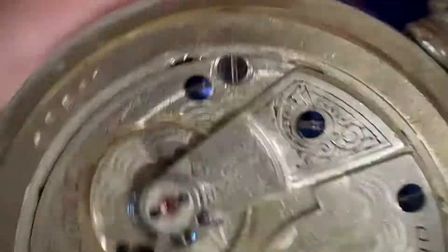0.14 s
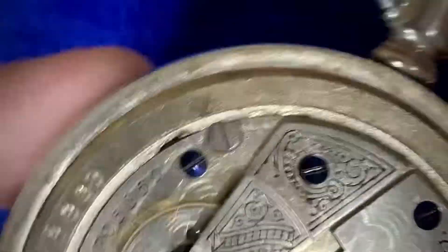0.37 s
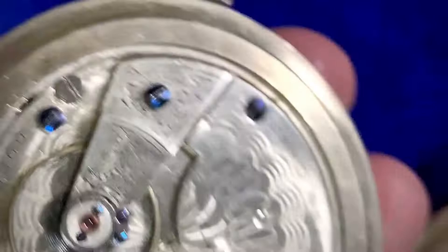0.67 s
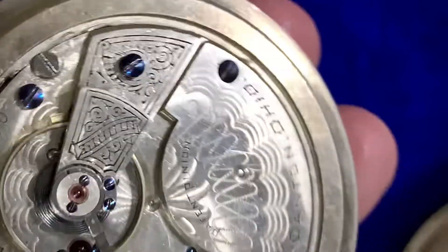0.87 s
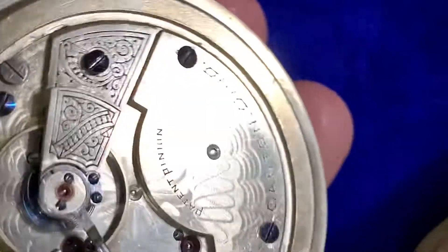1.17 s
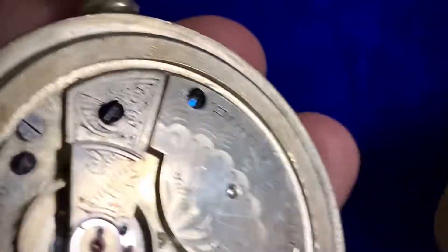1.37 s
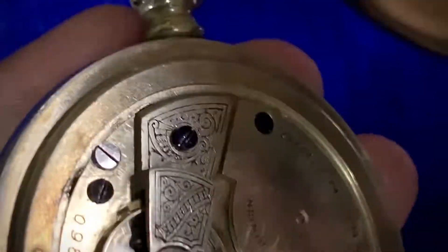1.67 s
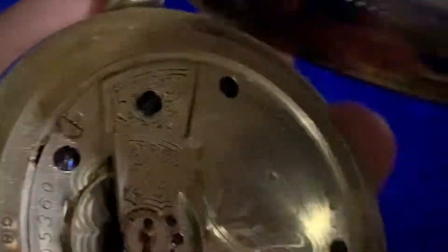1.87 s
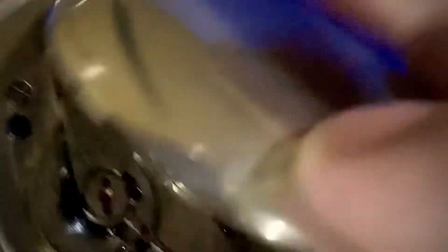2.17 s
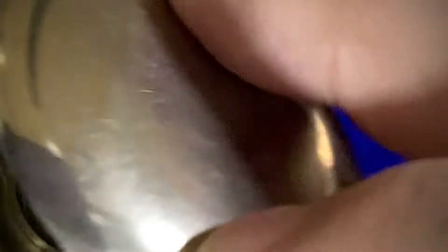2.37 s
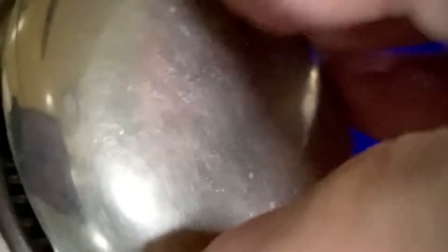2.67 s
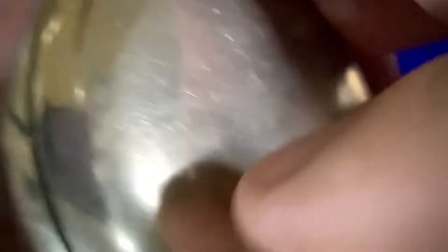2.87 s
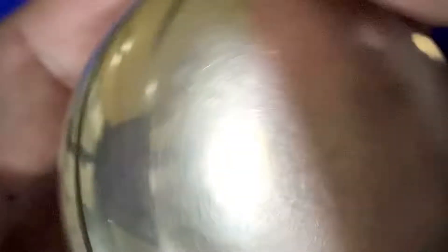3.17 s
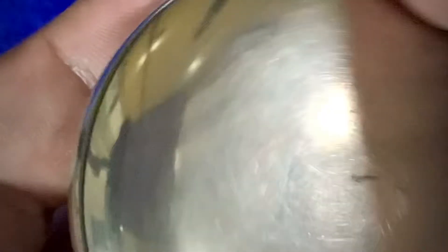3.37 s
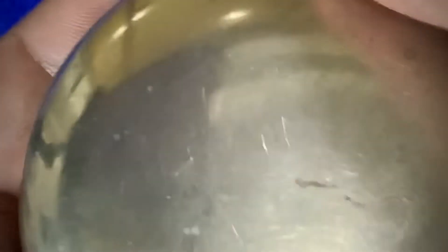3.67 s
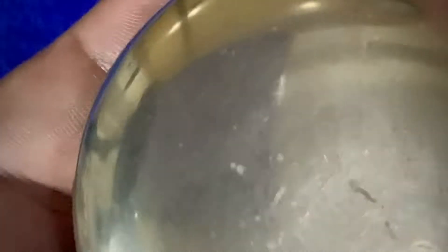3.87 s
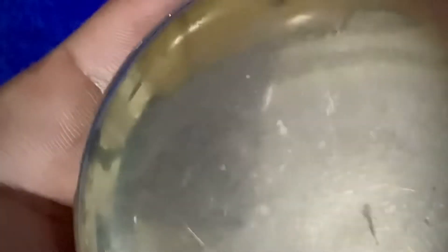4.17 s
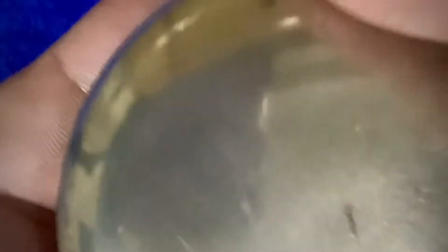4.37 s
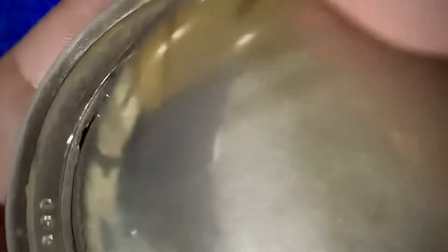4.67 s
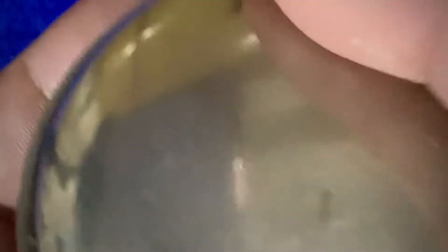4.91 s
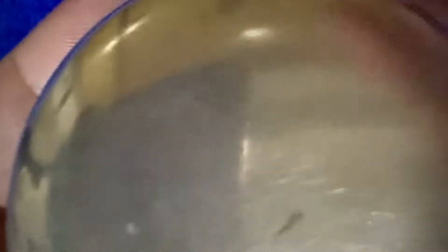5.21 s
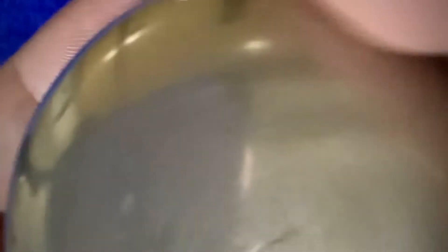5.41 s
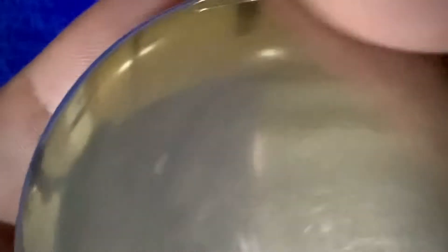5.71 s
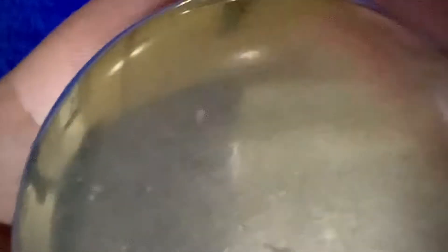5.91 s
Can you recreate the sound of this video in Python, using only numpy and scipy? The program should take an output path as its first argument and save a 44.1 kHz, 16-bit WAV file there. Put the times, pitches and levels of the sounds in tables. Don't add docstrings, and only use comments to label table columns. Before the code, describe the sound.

A pocket watch ticks faintly and rapidly in a quiet room, then its thin metal lid snaps shut and is knocked, clicked and rubbed by fingers.

```python
import sys
import numpy as np
from scipy import signal
from scipy.fft import rfft, irfft, next_fast_len
from scipy.io import wavfile
from scipy.ndimage import uniform_filter1d, minimum_filter1d

SR = 44100
rng = np.random.default_rng(int(sys.argv[2]) if len(sys.argv) > 2 else 0)


def volts_from_decibels(level):
    exponent = np.asarray(level, float) / 20
    return 10 ** exponent


def file_out(sig):
    cols = np.atleast_2d(sig).T
    lim = np.clip(cols, -1, 1)
    pcm = np.round(lim * 32767).astype(np.int16)
    wavfile.write(sys.argv[1], SR, pcm)


N = 266805

# (frequency [Hz], level [dB], time to fall 60 dB [s])
LID_MODES = [(4600, -18, .04), (4930, -5, .065), (4975, -1, .065), (6358, -26, .1), (7251, -20, .15),
             (7413, 1, .17), (7455, -12, .1), (8300, -17, .045), (8700, -20, .06), (9243, -20, .08),
             (9790, -22, .08), (10100, -17, .04), (10588, -2, .14), (10702, -7, .12), (11720, -2, .1),
             (11840, -4, .07), (12260, -15, .05), (12500, -12, .025), (13220, -22, .06), (14445, -9, .13),
             (14630, -14, .06)]
# (frequency [Hz], level [dB per Hz])
METAL_SHEEN = [(1500, -42.5), (3000, -21), (4900, -3.5), (6200, -10), (7500, -3.5), (11000, -6),
               (14500, -6), (15500, -9), (16600, -55.5)]
# (time [s], peak [dB], clatter
# [dB], upper ring [dB], how freely the lid rings [0-1])
SNAPS = [(1.786, -20.5, -14, -23, 0.23), (1.802, -26.5, -13.5, -28, 0.74), (1.808, -50.5, 41.5, -26, 0.7),
         (2.047, -36.5, -7.5, -28, 0.43), (2.559, -8.5, -28.5, -9, 0.15),
         (2.562, -15.5, -16.5, -17.5, 0.32), (2.751, -7, -15.5, -11.5, 0.32),
         (4.417, -23.5, -15.5, -23.5, 1), (4.481, -3, -19, -31.5, 0.26), (4.486, -7, -21.5, -12.5, 0.4),
         (4.493, -10, -16, -12.5, 0.4), (4.500, -14, -27.5, -24, 0), (4.54, -21, -14.5, -41, 0.7),
         (4.548, -16, -32.5, -9, 0.6), (4.575, -30.5, -9.5, -18.5, 1), (2.793, -17, -21.5, -10, 0.87),
         (4.128, -18, -16.5, -5.5, 1), (4.741, -24.5, -20, -17, 0.5), (4.766, -16, -5.5, -4.5, 0.89),
         (4.769, -9.5, -51, -1, 0), (4.914, -30.5, -1, -2.5, 0.88), (4.931, -25, -54, -13, 0.7),
         (4.937, -16, -16, -16, 0.6), (4.943, -16.5, -21, -1, 0.36)]
# (time [s], peak [dB], hollow [dB],
# how freely the lid rings [0-1])
KNOCKS = [(2.182, -52.5, -54, 1), (2.736, -33, 8.5, 1), (4.607, -41, -12, 0), (3.146, -53, -15.5, 1),
          (3.196, -28.5, -1.5, 0.09), (3.33, -45.5, -2.5, 1), (3.346, -40, -13, 0.9),
          (3.462, -44.5, 12.5, 0.68), (3.474, -99, 0, 0.5), (3.704, -20.5, -11.5, 0.17),
          (3.712, -25, -15.5, 1), (3.732, -26.5, -7.5, 0.2), (3.742, -23, -16, 0.58),
          (3.845, -38, -7.5, 0.5), (4.021, -49.5, 0, 1), (4.032, -36, -9.5, 1), (4.097, -31.5, -15, 0.5),
          (4.202, -52, -22, .6), (4.142, -25, -15, 0.46), (4.346, -10.5, -17, 0.19),
          (4.398, -21.5, -7, 0.2), (4.41, -21.5, -11, 0), (5.049, -35, -13, 1), (5.098, -29.5, -13, 0.9),
          (5.102, -36.5, -10, 1), (5.119, -19.5, -21, 0.14), (5.369, -30, -10.5, 0.56),
          (5.381, -39.5, -12, 1), (5.428, -23.5, -10, 0), (5.707, -57, -16, 0.96)]
LID_RING_ON = 1.136
STIR_WIDTH_HZ = 25


def evened(x):
    return x / np.sqrt(np.mean(x ** 2) + 1e-20)


def by_attack(x):
    return x / np.sqrt(np.mean(x[:350] ** 2) + 1e-20)


def peaked(x):
    return x / abs(x).max()


def dying(t, t60):
    return volts_from_decibels(-60 * t / t60)


def faded_end(t):
    return np.minimum((t[-1] - t) / .03, 1)


def read(points, hz, axis=1):
    rows = np.array(points)
    return np.interp(np.log(hz + 1), np.log(rows[:, 0] + 1), rows[:, axis])


def curve(rows):
    rows = np.array(rows)
    return np.interp(np.arange(N) / SR, rows[:, 0], rows[:, 1])


def add(mix, s, sound):
    part = mix[max(round(s * SR), 0):][:len(sound)]
    part += sound[:len(part)]


def resonate(x, hz, width):
    return signal.lfilter(*signal.iirpeak(min(hz, .49 * SR), max(hz / width, .3), SR), x)


def body(x, peaks):
    return sum(volts_from_decibels(db) * resonate(resonate(x, hz, w), hz, 2 * w) for hz, w, db in peaks)


def shifted(peaks, spread):
    draws = rng.standard_normal((len(peaks), 2))
    return [(hz * np.exp(spread * a), w, db + 2.5 * b) for (hz, w, db), (a, b) in zip(peaks, draws)]


def coloured(x, points):
    size = x.shape[-1]
    return irfft(rfft(x) * volts_from_decibels(read(points, np.fft.rfftfreq(size, 1 / SR))), size)


def ring(modes, t, free, spread_db):
    hz, db, t60 = np.transpose(modes)[:, :, None]
    weight, detune = rng.standard_normal((len(modes), 2)).T[:, :, None]
    rise = 1 - np.exp(-t / .0003)
    shape = volts_from_decibels(db + spread_db * weight) * np.exp(-np.log(1000) / (t60 * free) * t) * rise
    return shape * np.sin(2 * np.pi * hz * (1 + .0015 * detune) * t)


def air():
    # (frequency [Hz], level [dB per Hz])
    hiss_spectrum = [(15, -31), (25, -19.5), (70, -8.5), (177, -10), (304, -16), (445, -32), (524, -25.5),
                     (687, -20), (1060, -27), (1780, -29.5), (2090, -27), (3320, -30), (13300, -36),
                     (14800, -47), (16500, -48.5)]
    # (frequency [Hz], correlation [-1 to 1])
    likeness = [(60, 0.63), (150, 0.89), (380, 0.73), (950, -1.1), (2380, 0.064), (5980, 0.22),
                (15000, -1.7)]
    # (time [s], level [dB])
    drone_level = [(0.0, -59.5), (0.66, -58), (2.7, -65), (2.85, -71.5), (4.08, -71.5), (4.48, -58.5),
                   (4.73, -74), (5.73, -73.5), (6.05, -55)]
    # (frequency [Hz], width [Hz], level [dB])
    drone_tones = [(265.4, 32, 6), (304.8, 13, 9.5), (413, 12, 1), (209, 90, 4.5), (700, 88, -8.5)]
    # (time [s], level [dB])
    rumble_level = [(0.0, -61.5), (0.57, -60), (2.39, -65), (2.78, -59), (2.95, -68), (4.04, -65),
                    (4.21, -57), (5.37, -72), (6.05, -58)]
    # (frequency [Hz], width [Hz], level [dB])
    whine_bands = [(14400, 50, -90)]
    frames, hz = N // 512 + 5, np.fft.rfftfreq(2048, 1 / SR)
    a, b, c, d, patches = rng.standard_normal((frames, 1025, 5)).T
    patches = evened(uniform_filter1d(uniform_filter1d(patches, 20, 0), 8, 1))
    same = np.clip(read(likeness, hz), -1, 1)[:, None]
    left = a + 1j * b
    right = same * left + np.sqrt(1 - same ** 2) * (c + 1j * d)
    z = np.array([left, right]) * volts_from_decibels(read(hiss_spectrum, hz)[:, None] + 2.5 * patches)
    tone = volts_from_decibels(-69.5) * evened(signal.istft(z, nperseg=2048, noverlap=1536)[1][:, :N])
    noise = rng.standard_normal((3, N))
    noise = noise[0] + 0.35 * noise[1:]
    drone = volts_from_decibels(curve(drone_level) - 3.0) * evened(body(noise, drone_tones))
    rumble = volts_from_decibels(curve(rumble_level) + 2.5) * evened(body(noise, [(61.5, 14, 1.5), (103.0, 23, -8.5)]))
    whine = sum(volts_from_decibels(db) * evened(body(noise, [(f, w, 0)])) for f, w, db in whine_bands)
    return tone + drone + rumble + whine


def settling():
    kicks = np.zeros(N)
    for s, db, *_ in SNAPS + KNOCKS:
        add(kicks, s, volts_from_decibels([db / 2 - 50]))
    return signal.lfilter([1], [1, -dying(1 / SR, 0.35)], kicks)


def rubbing():
    # (time [s], level [dB])
    grip = [(0, -88.5), (.5, -72), (.85, -74.5), (1.2, -87.5), (1.75, -77.5), (1.97, -71), (2.4, -82.5),
            (2.6, -80), (2.73, -54.5), (2.9, -76.5), (3.3, -67.5), (3.5, -89), (4.1, -72.5), (4.5, -65.5),
            (4.82, -76), (4.97, -55), (5.22, -90.5), (6.05, -64)]
    # (frequency [Hz], level [dB per Hz])
    skin_spectrum = [(290, -32), (500, -15), (949, -6.5), (1380, -2), (2010, -7.5), (2220, -6), (2620, -9),
                     (7000, -12.5), (9100, -43.5), (15400, -120)]
    clumps = evened(uniform_filter1d(rng.standard_normal((2, N)), 700))
    bursts = np.minimum(rng.exponential(1, N), 4)
    grains = rng.standard_normal((2, N)) * volts_from_decibels(3.0 * clumps + 1.5 * bursts)
    stirred = sum(volts_from_decibels(db) * resonate(grains[1], hz, 2 / t60 + STIR_WIDTH_HZ) for hz, db, t60 in LID_MODES)
    whisper = evened(coloured(grains[1], METAL_SHEEN)) + volts_from_decibels(-7.5) * evened(stirred)
    grip_db = curve(grip)
    skin = volts_from_decibels(grip_db - 1) * evened(coloured(grains[0], skin_spectrum))
    return skin + (volts_from_decibels(grip_db - 6) + settling()) * whisper


def bump(db, hz):
    t, t60 = np.arange(4000) / SR, 0.0086 + 5 / hz
    push = rng.standard_normal(len(t)) * dying(t, 2.1 * t60) * np.minimum(t / 0.00042, 1)
    sound = body(push, [(hz, 2.1 / t60 + 0.17 * hz, 0), (1.4 * hz, 1.0 * hz, -12)])
    soft = signal.butter(4, 1.8 * hz, fs=SR, output="sos")
    return volts_from_decibels(db) * peaked(signal.sosfilt(soft, sound))


def scrape(length, db, hz, width):
    size = round(length * SR)
    noise, lumps = rng.standard_normal((2, 30000))[:, :size]
    rubbed = body(noise * volts_from_decibels(3.0 * evened(uniform_filter1d(lumps, 200))), [(hz, width, 0)])
    return volts_from_decibels(db) * evened(rubbed) * signal.windows.tukey(size, .5) * np.linspace(1.2, .7, size)


def slide(length, db, hz):
    return scrape(length, db, hz, min(0.61 * hz * (hz / 1500) ** 0.42, SR / 8))


def drag(length, db):
    size = round(length * SR)
    noise, grit = rng.standard_normal((2, 6000))
    grains = noise * volts_from_decibels(1.4 * grit) * np.pad(np.hanning(size), (0, 6000 - size))
    stirred = sum(volts_from_decibels(v) * resonate(grains, hz, 2 / t60 + 4 * STIR_WIDTH_HZ) for hz, v, t60 in LID_MODES)
    sound = evened(coloured(grains, METAL_SHEEN)) + volts_from_decibels(-1.5) * evened(stirred)
    return volts_from_decibels(db) * sound / np.sqrt(np.mean(sound[:size] ** 2))


def escapement():
    # (time from the drop [s], level [dB], pitch factor)
    beat_steps = [
        (-.043, -20, 1.0),
        (-.022, -19, 1.02),
        (-.010, -14, .99),
        (0, 0, 1.0),
        (.0025, -5, .98),
        (.02, -20, .7),
        (.052, -22, .68),
    ]
    # (frequency [Hz], level [dB], time to fall 60 dB [s])
    plate_modes = [(4845, -26, .05), (7200, -12, .05), (8950, -22, .03), (10640, -16, .022),
                   (12650, -1, .016), (13520, -2, .022), (14700, -14, .02)]
    # (time [s], peak [dB])
    openness = [(.1, -43.5), (.65, -42.5), (1.2, -42), (1.5, -41.5), (1.95, -43.5), (2.3, -38.5),
                (3.0, -48), (3.5, -43.5), (6.05, -46.5)]
    first_beat_s, beat_s, beats = .0032, .19983, 31
    tock_db, spread_db, hum_lead_s = -6, .8, .02
    out, t, slow = np.zeros(N), np.arange(2400) / SR, np.arange(8000) / SR
    for k, s in enumerate(first_beat_s + beat_s * np.arange(beats)):
        tock = 1 - k % 2
        db = np.interp(s, *np.transpose(openness)) + tock * tock_db + spread_db * rng.standard_normal()
        haze = coloured(rng.standard_normal(5000), METAL_SHEEN) * signal.windows.tukey(5000, .4)
        add(out, s - .047, volts_from_decibels(-81.0) * evened(haze))
        hum = ring([(2065, 0, .33)], slow, 1, 1.5)[0] * np.minimum(slow / hum_lead_s, 1)
        damped_db = 0 if .3 < s < 1.9 else -9
        add(out, s - hum_lead_s, volts_from_decibels(-60 + (1.5 - tock) * -9 + damped_db) * hum)
        for delay, step_db, pitch in beat_steps:
            size = 6 if step_db > -10 else 220
            touch = rng.standard_normal(size) * np.hanning(size + 2)[1:-1]
            fizz = rng.standard_normal(len(t)) * volts_from_decibels(-1) * dying(t, .024) * np.minimum(t / .0003, 1)
            fizz = np.diff(coloured(fizz, METAL_SHEEN), prepend=0)
            tap = ring(plate_modes, t * pitch, .7, 3.0).sum(0) + fizz
            tap = signal.oaconvolve(tap, touch)
            add(out, s + delay, volts_from_decibels(db + step_db + spread_db * rng.standard_normal()) * peaked(tap))
    return out


def ping(db, hz, free):
    t = np.arange(8192) / SR
    near = np.exp(-.5 * (np.log(np.array(LID_MODES)[:, 0] / hz) / 0.038) ** 2)
    modes = ring(LID_MODES, t, LID_RING_ON * np.clip(free, .08, 1.2), 2.0)
    sound = near @ modes * (1 - np.exp(-t / 0.00059))
    return volts_from_decibels(db) * peaked(sound) * faded_end(t)


def blow(db, hollow_db, clatter_db, upper_db, free):
    # (frequency [Hz], width [Hz], level [dB])
    hollow_peaks = [(845, 440, -11.5), (1450, 90, -4), (470, 1100, -23)]
    # (frequency [Hz], width [Hz], level [dB])
    clatter_peaks = [(1762, 410, 2), (2300, 300, 3), (3106, 398, 0.5), (4203, 2630, -7)]
    t, free = np.arange(8192) / SR, np.clip(free, .08, 1.2)
    grit = rng.standard_normal((2, len(t)))
    chatter = grit[0] * volts_from_decibels(2.0 * grit[1]) * dying(t, 0.089 * free) * np.minimum(t / 0.00028, 1)
    strike = chatter[:500] * dying(t[:500], .0015)
    modes = ring(LID_MODES, t, LID_RING_ON * free ** .8, 2.5)
    upper = np.array(LID_MODES)[:, 0] > 9000
    lower_ring = signal.oaconvolve(modes[~upper].sum(0), strike)[:len(t)]
    upper_ring = signal.oaconvolve(modes[upper].sum(0), strike)[:len(t)]
    crack = coloured(chatter * (dying(t, .035) + volts_from_decibels(-14)), METAL_SHEEN)
    rattle = volts_from_decibels(1.5 * evened(uniform_filter1d(grit[1], 90)))
    rings = rattle * (volts_from_decibels(-16) * by_attack(lower_ring) + volts_from_decibels(upper_db) * by_attack(upper_ring))
    metal = rings + volts_from_decibels(-10) * by_attack(crack)
    hollow = body(chatter, shifted(hollow_peaks, .1))
    clatter = body(chatter, shifted(clatter_peaks, .05))
    sound = metal + volts_from_decibels(hollow_db) * by_attack(hollow) + volts_from_decibels(clatter_db) * by_attack(clatter)
    return volts_from_decibels(db) * peaked(sound) * faded_end(t)


def knock(db, hollow_db, free):
    return blow(db, hollow_db, hollow_db - 0.5, -15, free)


def snap(db, clatter_db, upper_db, free):
    return blow(db, -32.5, clatter_db, upper_db, free)


def pair(x):
    # (frequency [Hz], left minus right [dB], left lead [rad], phase ripple [rad])
    ports = [(300, 0, 0, .1), (800, -3, -.4, .4), (1300, -5, -1.6, .9), (2000, -8, -4.0, .8),
             (3200, -4, -6.6, .9), (4900, -6, -10.4, .6), (6300, -2, -12.3, .5), (7400, 0, -12.6, .3),
             (10500, 0, -13.0, .2), (14000, 0, -13.5, .3)]
    lead_s = .0004
    size = next_fast_len(N + 4096)
    hz = np.fft.rfftfreq(size, 1 / SR)
    ripple = np.interp(hz, np.linspace(0, SR / 2, 120), rng.standard_normal(120))
    turn = read(ports, hz, axis=2) + 3.67 * read(ports, hz, axis=3) * ripple
    half_db = read(ports, hz) / 2
    ahead = (size - np.arange(size)) / SR * (np.arange(size) > size // 2)
    left = irfft(np.exp(1j * turn) * volts_from_decibels(half_db), size) * np.exp(-(ahead / lead_s / 2) ** 4)
    both = np.array([rfft(left) * volts_from_decibels(1.5), volts_from_decibels(-half_db)])
    return irfft(rfft(x, size) * both, size)[:, :N]


def room(x):
    # (frequency [Hz], time to fall 60 dB [s])
    echo_times = [(300, 0.2), (4000, 0.28), (15000, 0.014)]
    hz, t, z = signal.stft(rng.standard_normal((2, SR // 2)), SR, nperseg=256)
    tail = signal.istft(z * dying(t, read(echo_times, hz)[:, None]), SR, nperseg=256)[1]
    tail *= np.minimum(np.arange(tail.shape[1]) / 300, 1)
    return signal.fftconvolve(x[None], tail / np.linalg.norm(tail[0]), axes=1)[:, :N]


def scene():
    # (time [s], peak [dB], pitch [Hz])
    bumps = [(.367, -44.5, 2300), (.368, -54, 3900), (.762, -41.5, 370), (.764, -55, 920),
             (1.786, -39, 594), (1.786, -20.5, 2680), (.775, -46, 192), (1.787, -45.5, 250),
             (2.66, -37, 2230), (2.684, -43.5, 2000), (2.795, -30.5, 970), (4.13, -32, 899),
             (3.07, -59, 946), (3.695, -39, 804), (4.041, -50, 810), (4.292, -56, 700), (4.321, -37.5, 830),
             (4.347, -41, 477), (4.349, -27.5, 784), (4.385, -31.5, 994), (5.305, -54.5, 1440),
             (5.349, -49, 1394), (5.468, -66, 980), (5.633, -45, 769), (5.661, -58.5, 752),
             (5.768, -51.5, 1208), (5.99, -48.5, 880), (6.034, -42, 870)]
    # (time [s], length [s], level [dB], pitch [Hz])
    slides = [(.875, 0.065, -63.5, 3420), (.88, 0.07, -63.5, 1370), (1.82, 0.2, -67, 1570),
              (2.17, 0.072, -64, 2300), (2.69, 0.036, -60, 2060), (2.8, 0.15, -69, 1560),
              (3.2, 0.035, -65, 1300), (3.35, 0.095, -63, 1164), (3.86, 0.086, -67, 1390),
              (4.05, 0.046, -63, 960), (4.355, 0.07, -42.5, 970), (4.4, 0.026, -34, 3360),
              (4.75, 0.025, -38.5, 3600), (4.775, 0.086, -57.5, 2970), (4.92, 0.033, -64, 3770),
              (4.925, 0.032, -43, 1160), (5.015, 0.041, -56, 1240), (5.09, 0.021, -51, 2920),
              (5.335, 0.087, -61, 1514), (5.34, 0.045, -65, 7030), (4.66, 0.17, -58.5, 5100),
              (4.045, 0.11, -55.5, 7960), (5.43, 0.052, -55, 1004), (5.86, 0.096, -66.5, 1460)]
    # (time [s], length [s], level [dB], pitch [Hz], width [Hz])
    squeaks = [
        (1.7, 0.59, -73.5, 400, 69),
        (2.655, 0.056, -55, 2150, 220),
        (4.15, .13, -63, 170, 36),
        (3.2, 0.49, -83.5, 7100, 620),
        (.49, 0.19, -77.5, 2580, 89),
        (.49, 0.17, -77, 2900, 94),
        (0.5, 0.025, -66, 8900, 910),
    ]
    # (time [s], peak [dB], pitch of the ringing tones [Hz], how freely they ring [0-1])
    pings = [(1.786, -23.5, 7400, 0.36), (1.786, -35.5, 10600, 0.1), (1.803, -25.5, 7400, 0.25),
             (1.803, -38.5, 11100, 0.32), (2.046, -61.5, 10600, 0.8), (2.559, -19, 10600, 0.51),
             (2.562, -27, 7400, 0.43), (2.750, -16.5, 10700, 0.62), (2.751, -16.5, 7400, 0.22),
             (2.794, -18.5, 10340, 0.2), (4.127, -23.5, 12400, 1), (4.349, -35, 7400, 0.74),
             (4.416, -34, 10850, 0.95), (4.420, -27, 7400, 0.65), (4.487, -12, 10900, 0.78),
             (4.489, -13, 11900, 0.8), (4.494, -13, 7400, 0.92), (4.504, -20.5, 14450, 0.5),
             (4.546, -26, 7400, 0.56), (4.547, -23, 10550, 0.54), (4.769, -9.5, 11900, 0.25),
             (4.942, -31, 10600, 0.3)]
    # (time [s], length [s], level [dB])
    drags = [(2.559, 0.021, -35), (4.394, 0.043, -42), (4.484, 0.035, -26.5), (4.539, 0.026, -30),
             (4.915, 0.055, -41), (3.7, 0.072, -47.5), (4.74, 0.043, -50)]
    # (time [s], peak [dB], pitch of the ringing tones [Hz], how
    more_pings = [(.605, -53.5, 4900, 0.8), (1.787, -46, 4900, 1), (2.046, -44.5, 7400, 0.42),
                  (2.047, -51, 10800, 0.5), (2.047, -40.5, 4900, 1), (2.56, -43, 14500, .9),
                  (2.561, -26.5, 5000, .9), (2.752, -28.5, 14500, 0.7), (2.795, -34.5, 14500, .5),
                  (4.348, -28, 14500, 0.4), (4.348, -27, 11750, .3), (4.349, -22, 4950, 0.7),
                  (4.418, -28, 4950, 1), (4.486, -15, 4950, 1), (4.487, -33, 14450, 1),
                  (4.548, -19.5, 4950, 0.5), (4.548, -28, 11940, .6), (4.55, -41, 14450, 1.01),
                  (4.555, -32, 7400, 0.6), (4.741, -37, 9150, 0.5), (4.77, -23, 4900, 0.75),
                  (4.77, -23.5, 8570, 0.6), (4.778, -46, 11750, 1.1), (4.915, -35, 14500, .5),
                  (4.915, -30, 8500, 0.23), (4.938, -27, 4950, 0.5), (4.938, -26, 14600, 0.5),
                  (4.946, -37, 10750, 1), (5.104, -38.5, 10700, 0.77), (5.12, -44, 10920, 0.5),
                  (5.12, -32, 4870, 0.73), (3.705, -31, 10800, 0.9), (4.13, -43, 7350, 0.9),
                  (4.13, -40.5, 14500, 0.6)]
    # (time [s], length [s], level [dB], pitch [Hz], width [Hz])
    rasps = [(2.558, .03, -44, 2250, 500), (2.58, .08, -56, 2250, 500), (4.78, .07, -54, 1900, 500),
             (4.93, .03, -44, 2000, 1200), (4.03, .09, -62, 1330, 200), (3.46, .05, -62, 1330, 300),
             (4.775, .03, -44, 3100, 500), (1.787, .03, -44, 6100, 900), (5.36, .04, -56, 1450, 200),
             (5.87, .1, -70, 4400, 300), (5.02, .05, -60, 800, 300), (2.62, .13, -62, 14500, 150),
             (2.58, .07, -60, 8500, 500), (4.39, .09, -50, 14500, 150), (4.345, .016, -35, 780, 300),
             (2.17, .08, -68, 4900, 200), (3.12, .36, -66, 10660, 160), (2.84, .3, -67, 10660, 160),
             (3.3, .12, -66, 7420, 60)]
    # (time [s], length [s], level [dB])
    creeps = [(4.336, .014, -58), (3.188, .016, -48), (3.728, .032, -35), (5.36, .016, -56),
              (5.418, .018, -46), (4.35, .05, -50), (1.786, .03, -45), (2.75, .03, -40), (5.69, .06, -66),
              (4.77, .07, -50), (5.1, .014, -45), (4.126, .035, -36)]
    near = np.zeros((4, N))
    near[0] = escapement() + rubbing()
    for table, source in [(SNAPS, snap), (KNOCKS, knock), (bumps, bump), (slides, slide), (squeaks, scrape),
                          (pings, ping), (drags, drag)]:
        for k, (s, *row) in enumerate(table):
            add(near[k % 3], s, source(*row))
    mix = sum(pair(x) for x in near[:3]) + volts_from_decibels(-14.5) * room(near.sum(0)) + air()
    for table, source in [(more_pings, ping), (rasps, scrape), (creeps, drag)]:
        for s, *row in table:
            add(near[3], s, source(*row))
    return mix + pair(near[3])


def thinned(x):
    hz, _, z = signal.stft(x, SR, nperseg=512)
    bands = (abs(z[:, :256]) ** 2).mean(0).reshape(64, 4, -1).mean(1)
    level_db = 10 * np.log10(abs(uniform_filter1d(bands, size=5, axis=1)) + 1e-20)
    loud_db = -minimum_filter1d(-level_db, size=9, axis=0)
    chance = rng.standard_normal(level_db.shape[::-1])
    chance = evened(uniform_filter1d(chance, size=10, axis=0)).T
    under = loud_db - 21 + 7.0 * chance - level_db
    cut_db = -25 / (1 + np.exp(-np.clip(2 * under, -30, 30)))
    cut_db = np.pad(np.repeat(cut_db, 4, axis=0), ((0, 1), (0, 0))) * (hz[:, None] > 2500)
    return signal.istft(z * volts_from_decibels(cut_db), SR, nperseg=512)[1][:, :N]


def top_cut(x):
    return signal.sosfilt(signal.butter(12, 16650, fs=SR, output="sos"), x)


def record(dry):
    # (frequency [Hz], level [dB])
    mic_response = [(20, -14), (45, -2), (70, 0), (14900, 0), (15400, -11), (16500, -17), (16800, -90)]
    mix = thinned(coloured(dry, mic_response))
    return top_cut(mix)


dry = scene()
out = record(dry)
file_out(out)
```